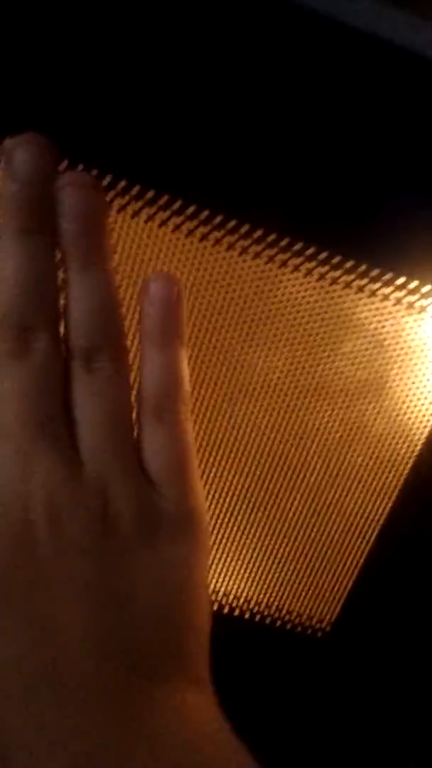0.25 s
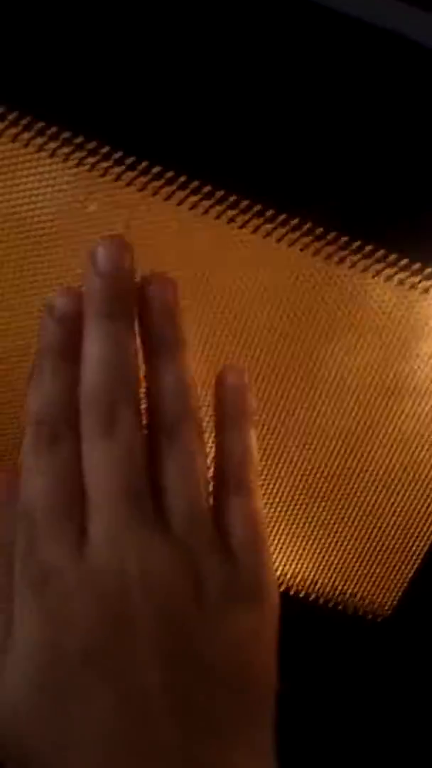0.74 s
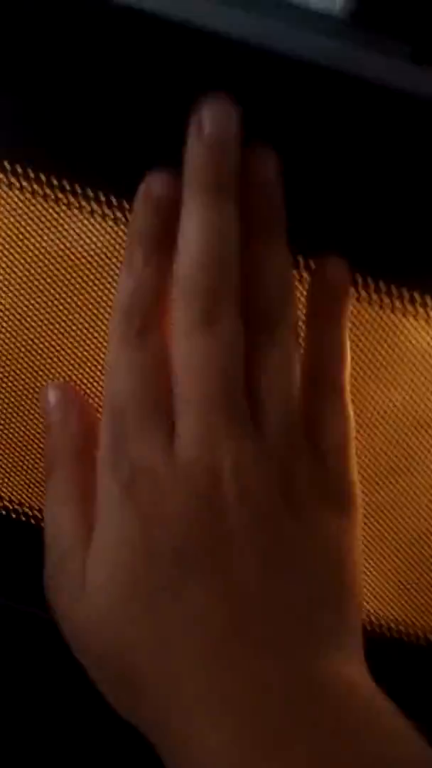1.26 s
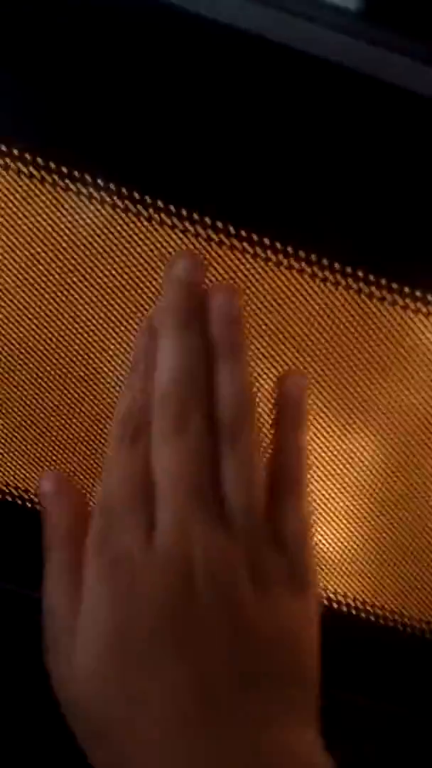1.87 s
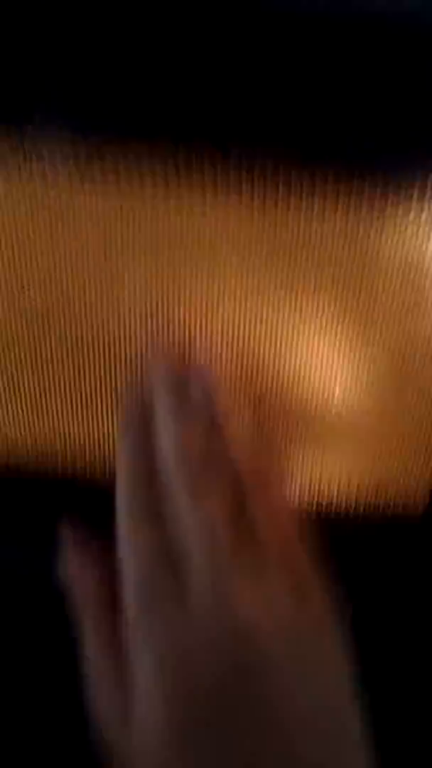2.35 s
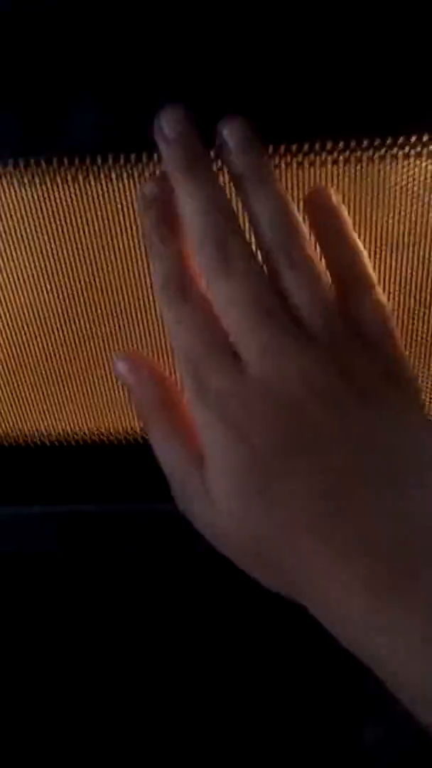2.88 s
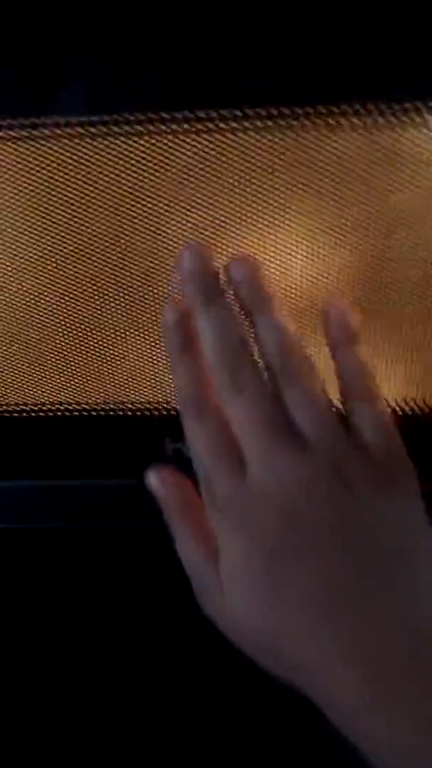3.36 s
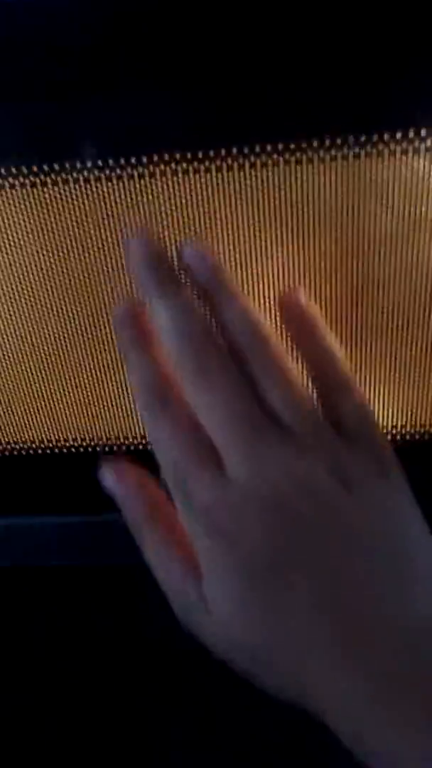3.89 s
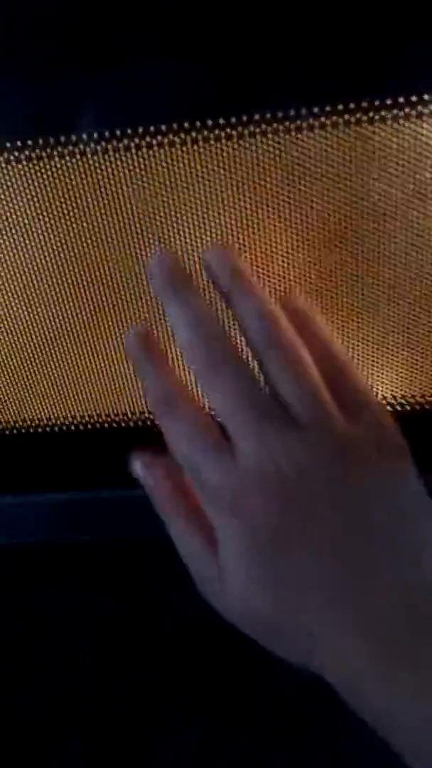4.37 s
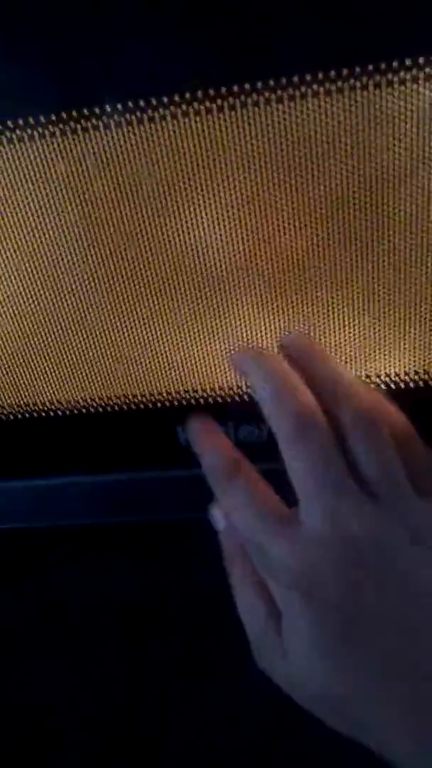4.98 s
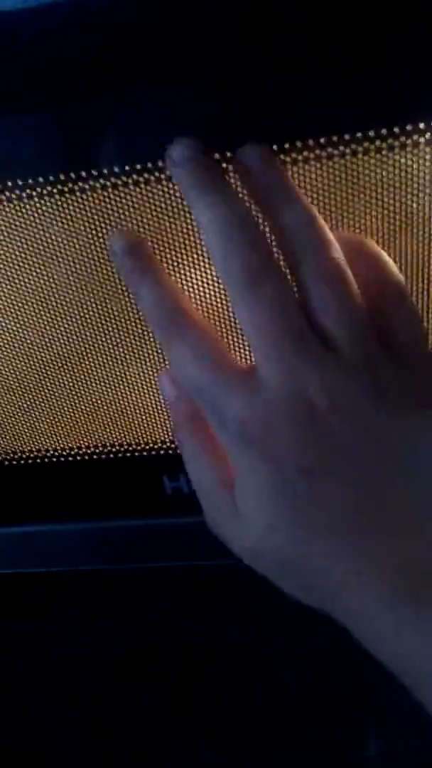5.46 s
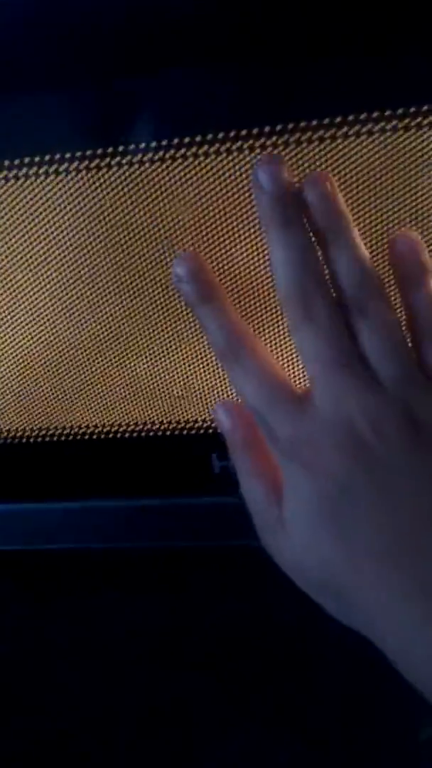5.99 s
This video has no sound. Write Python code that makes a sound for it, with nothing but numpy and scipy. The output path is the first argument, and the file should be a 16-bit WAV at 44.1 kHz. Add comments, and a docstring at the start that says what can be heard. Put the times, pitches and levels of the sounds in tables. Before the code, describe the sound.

Steady low electrical hum and fluttering vent air from a running oven, interrupted by handling knocks that make the drone dip and recover.

```python
"""A microwave oven hums, buzzes and blows close to a handheld camera: harmonics of the mains and of a fan's shaft
make the tones, filtered noise makes the rumble and the air rushing from the vents, which flutters.
Fingers tap, knock and rub on the camera: damped sines with snaps, and grainy noise; dull low noise swells briefly.
Two hard clicks push the gain control down, and the oven slowly swells back.
The two microphones have opposite polarity, so the hum sounds very wide."""
import sys
import numpy as np
from scipy.fft import rfft, irfft, next_fast_len
from scipy.io import wavfile
from scipy.ndimage import uniform_filter1d, minimum_filter1d, map_coordinates

SR = 44100
rng = np.random.default_rng(int(sys.argv[2]) if len(sys.argv) > 2 else 0)


def pcm_store(signal):
    """Save signal as 16-bit PCM."""
    levels = np.round(np.clip(np.atleast_2d(signal), -1, 1) * 32767)
    wavfile.write(sys.argv[1], SR, levels.astype(np.int16).T)


N = 274743
CLOCK = np.arange(N) / SR  # seconds

# Levels in the tables hold at the source, before propagation, the gains of scene() and the microphones.


def amp(db):
    """Decibel law: level to linear gain."""
    return 10 ** (np.asarray(db) / 20)


def unit(x):
    """Normalisation by signal power: rms 1."""
    return x / np.sqrt(np.mean(x ** 2) + 1e-20)


def along(points, hz):
    """Logarithmic frequency scale: (Hz, value) points interpolated at hz."""
    point_hz, values = np.transpose(points)
    return np.interp(np.log(hz + 1), np.log(point_hz + 1), values)


def wobble(rate):
    """Slow random modulation: a smooth curve through rate random knots a second."""
    knots = rng.standard_normal(int(N * rate / SR) + 4)
    return map_coordinates(knots, [np.arange(N) * rate / SR])


def filtered(x, response, size=2048):
    """Linear filtering: the spectrum of x times a complex response of frequency."""
    m = next_fast_len(N + SR // 2)
    # mirrored ends stay smooth
    wide = np.pad(x, [(0, 0)] * (x.ndim - 1) + [(size, size)], mode="reflect")
    spectrum = rfft(wide, m) * response(np.fft.rfftfreq(m, 1 / SR))
    return irfft(spectrum, m)[..., size:size + N]


def noise(spectrum):
    """Spectral density: white noise shaped to the given dB per Hz."""
    return filtered(rng.standard_normal(N), lambda hz: amp(along(spectrum, hz)) * np.sqrt(SR / 2))


def ringing(modes):
    """Resonance under random excitation: noise bands with steep skirts, one for each mode."""
    def power(hz):
        total = 0
        for centre, width, db in modes:
            density = amp(db) ** 2 * SR / (np.pi * width)
            total = total + density / (1 + ((hz - centre) / width) ** 2) ** 2
        return total
    return filtered(rng.standard_normal(N), lambda hz: np.sqrt(power(hz)))


PORT_LAG = .000317  # seconds between the microphones for short waves along their line


def ports(x, knee_hz=800, slant=1):
    """Phase difference on arrival: short waves reach the right microphone first, long waves press on both alike.

    A slanting arrival (slant below 1) shortens the lag."""
    def turn(hz):
        return np.pi * hz * PORT_LAG * slant * hz ** 4 / (hz ** 4 + knee_hz ** 4)
    return filtered(x, lambda hz: np.exp(1j * np.outer([-1, 1], turn(hz))))


def partials(orders, phase, flutter_db):
    """Harmonic series: sines at multiples of one phase; the higher ones waver more in level."""
    total = 0
    for k, db in orders:
        level = amp(db + flutter_db * np.sqrt(k) * wobble(15))
        start = rng.uniform(0, 2 * np.pi)
        total = total + np.sqrt(2) * level * np.sin(k * phase + start)
    return total


MAINS_HZ = 59.97
# The transformer and the panels it shakes. Each row: multiple of the mains frequency, level in dB rms.
HUM_HARMONICS = [(1, -34.8), (2, -12.8), (3, -33), (4, -31.5), (5, -38), (6, -48), (8, -53), (9, -54),
                 (12, -58), (14, -57), (22, -55.5), (28, -64), (32, -62), (55, -67.5), (61, -68), (71, -69),
                 (79, -73)]
# Line spectrum of rattling loose steel. Each row: frequency in Hz, amplitude of a line in dB before its scatter.
BUZZ_LINES = [(1200, -82), (2000, -71), (2900, -73), (3600, -76), (4400, -83), (5500, -92), (8000, -98)]


def transformer():
    """Magnetostriction: the core hums at twice the mains rate; loose steel adds a faint buzz of high harmonics."""
    phase = 2 * np.pi * MAINS_HZ * CLOCK + 0.0068 * wobble(3.0)
    hum = partials(HUM_HARMONICS, phase, flutter_db=.36)
    # every mains cycle repeats the same rattle
    orders = np.arange(20, 130)
    cycle = np.linspace(0, 2 * np.pi, num=4096, endpoint=False)
    sizes = amp(along(BUZZ_LINES, orders * MAINS_HZ) + 2 * rng.standard_normal(len(orders)))
    starts = rng.uniform(0, 2 * np.pi, (len(orders), 1))
    rattle = sizes @ np.sin(np.outer(orders, cycle) + starts)
    buzz = np.interp(phase, cycle, rattle, period=2 * np.pi)
    return ports(hum + buzz, slant=0.77)


SHAFT_HZ = 46.58  # mean speed of the shaft
# A fan with four blades. Each row: multiple of the shaft speed, level in dB rms.
FAN_HARMONICS = [(1, -37.5), (4, -28), (5, -45), (8, -35), (12, -40), (16, -49.5), (24, -55), (36, -60)]
# Narrow modes of the casing. Each row: frequency in Hz, half-width in Hz, level in dB rms.
CASING_MODES = [(75, 2, -52), (167, 4, -35), (260, 3, -45), (307, 2, -38)]
# Low turbulence noise. Each row: frequency in Hz, density in dB per Hz.
RUMBLE_SPECTRUM = [(25, -84), (42, -77), (60, -67), (100, -54.5), (165, -46.5), (215, -52), (280, -56),
                   (335, -63), (390, -55), (450, -59), (510, -63.5), (640, -73), (900, -76), (1600, -110)]


def fan():
    """Blade-passing tones and turbulence: the fan turns a little unevenly and shakes the casing, which radiates."""
    speed = SHAFT_HZ * (1 + 0.002 * wobble(2.91))
    blades = partials(FAN_HARMONICS, 2 * np.pi * np.cumsum(speed) / SR, flutter_db=.3)
    rumble = amp(1.7 * wobble(14)) * noise(RUMBLE_SPECTRUM)
    return ports(blades + ringing(CASING_MODES) + rumble, slant=0.68)


VENT_FLUTTER_DB, VENT_FLUTTER_PER_S = 2.1, 16  # random swing, knots a second


def fluttering(modes, count=3):
    """Amplitude modulation by eddies: resonances in interleaved groups, so neighbours swell at different moments."""
    total = 0
    for i in range(count):
        swell = unit(amp(VENT_FLUTTER_DB * wobble(VENT_FLUTTER_PER_S)))
        total = total + swell * ringing(modes[i::count])
    return total


# Broadband noise of the air. Each row: frequency in Hz, density in dB per Hz.
AIR_SPECTRUM = [(30, -70), (150, -68.5), (300, -69.5), (400, -76), (600, -69), (800, -69.5), (1050, -70.5),
                (1300, -79.5), (2200, -76.5), (3300, -81), (4000, -87.5), (5200, -88), (6500, -92),
                (8200, -95), (9600, -99), (15500, -105)]
# Part of the air sound coming along the line of the microphones. Each row: frequency in Hz, power share 0-1.
DIRECT_SHARE = [(400, 0.64), (1000, 0.95), (1500, 0.54), (2100, 0.32), (3300, 0.85), (4800, 0.94),
                (8000, 0.95), (9500, 0.54), (15000, 0)]
AIR_FROM_RIGHT = 0.62  # power share of the direct air noise that arrives from the right
# Vent resonances at the first and at the last position.
# Each row: frequency in Hz, half-width in Hz, level in dB rms at that position.
VENT_MODES_FIRST = [(922, 135, -48.5), (925, 68, -44), (1160, 57, -51), (1480, 130, -49), (1640, 75, -47.5),
                    (1765, 52, -49), (1975, 61, -49), (2500, 340, -47), (2715, 32, -50.5), (3190, 300, -45),
                    (4260, 305, -59), (4740, 89, -61)]
VENT_MODES_LAST = [(894, 120, -55.5), (927, 29, -49), (1110, 64, -46.5), (1450, 53, -50), (1509, 25, -60),
                   (1668, 120, -47.5), (2066, 25, -69), (2320, 120, -61.5), (2756, 25, -51.5),
                   (3147, 245, -43.5), (4254, 200, -59.5), (4840, 55, -65.5)]
# Slow course of the airflow's level. Each row: time in seconds, gain in dB.
AIRFLOW_LEVEL = [(0, 1), (1, 0.53), (2, -0.26), (2.6, 3), (3.3, 1.1), (3.65, 1), (3.9, 0.9), (4.5, 1.5),
                 (5.3, 1.36), (6.2, 0.5)]


def vents(position):
    """Turbulent jet noise: air from both sides and the room, with resonances that change along the door."""
    def stream():
        first = np.sqrt(1 - position) * fluttering(VENT_MODES_FIRST)
        last = np.sqrt(position) * fluttering(VENT_MODES_LAST)
        return ports(noise(AIR_SPECTRUM) + first + last, knee_hz=917)

    from_right = np.sqrt(AIR_FROM_RIGHT) * stream()
    from_left = np.sqrt(1 - AIR_FROM_RIGHT) * stream()[::-1]
    room = np.array([noise(AIR_SPECTRUM), noise(AIR_SPECTRUM)])
    direct = filtered(from_right + from_left, lambda hz: np.sqrt(along(DIRECT_SHARE, hz)))
    diffuse = filtered(room, lambda hz: np.sqrt(1 - along(DIRECT_SHARE, hz)))
    seconds, level_db = np.transpose(AIRFLOW_LEVEL)
    return (direct + diffuse) * amp(np.interp(CLOCK, seconds, level_db) + 0.52 * wobble(15))


MOVE_S, MOVE_LENGTH_S = 2.2, 0.93  # middle and length of the move along the door


def camera_position():
    """Smooth kinematics: the camera rests (0), glides along the door and rests again (1)."""
    progress = np.clip((CLOCK - MOVE_S) / MOVE_LENGTH_S + .5, 0, 1)
    return np.sin(np.pi / 2 * progress) ** 2


SWAY_DB, SWAY_PER_S = 0.59, 1.8  # random swing and knots a second: the hand is never quite still
BACK_S, BACK_WIDTH_S, BACK_DB = 4.16, 0.54, -0.8  # drawing back: middle, half-width at 1/e, gain at the middle


def nearness():
    """Distance law as a gain: the hand sways, and draws back once."""
    drawn_back = np.exp(-((CLOCK - BACK_S) / BACK_WIDTH_S) ** 2)
    return amp(BACK_DB * drawn_back + SWAY_DB * wobble(SWAY_PER_S))


def blow(db, hz, pan_db, cycles, snap, snap_s=.00006):
    """Impact on a damped shell: a dead push, down 60 dB after a few cycles, with a sharp snap, in stereo."""
    t = np.arange(SR // 20) / SR
    push = np.sin(2 * np.pi * hz * t) * amp(-60 * t * hz / cycles)
    hit = push / np.abs(push).max() + snap * (1 - t / snap_s) * np.exp(-t / snap_s)
    return np.outer(amp([db + pan_db / 2, db - pan_db / 2]), hit / np.abs(hit).max())


def add(out, s, sound):
    """Superposition: mixes a sound into out at time s."""
    out[:, round(s * SR):][:, :sound.shape[1]] += sound


# Soft fingertip taps. Each row: start in seconds, peak in dB before the shell, pitch in Hz, left minus right in dB.
FINGER_TAPS = [(2.085, 1, 292, 0), (2.189, -22, 1300, -3), (2.304, -11, 780, -4), (2.406, -13, 350, 7),
               (2.457, -11, 647, -5), (4.0103, -11.5, 840, 5)]
TAP_CYCLES, TAP_SNAP = 4.8, 0.089  # cycles until 60 dB down, snap relative to the push
# Hard clicks. Each row: start in seconds, peak in dB before the shell, pitch in Hz, cycles until 60 dB down,
# snap relative to the push, delay of the bounce in seconds, strength of the bounce 0-1.
HARD_CLICKS = [(1.565, -20, 8200, 2, .37, 0.00076, .3), (2.0823, -13.5, 900, 3.4, .4, 0.00065, 0.55),
               (2.0851, 10.5, 668, 1.25, .5, 0.00027, 0.33), (2.3884, 25, 3740, 3.2, 0.26, .00073, 1)]
CLICK_PAN_DB = -2  # left minus right
# Transmission of the camera's shell. Each row: frequency in Hz, gain in dB.
SHELL_RESPONSE = [(30, -1.5), (250, -3), (4000, -2), (6300, 1.5), (9000, 0), (12000, -10), (15500, -14)]


def knocks():
    """Structure-borne impact: fingertips land softly, hard contacts snap and bounce once, through the shell."""
    out = np.zeros((2, N))
    for s, db, hz, pan_db in FINGER_TAPS:
        add(out, s, blow(db, hz, pan_db, TAP_CYCLES, TAP_SNAP))
    for s, db, hz, cycles, snap, bounce_s, bounce in HARD_CLICKS:
        click = blow(db, hz, CLICK_PAN_DB, cycles, snap)
        add(out, s, click)
        add(out, s + bounce_s, bounce * click)
    through_shell = filtered(out, lambda hz: amp(along(SHELL_RESPONSE, hz)))
    return ports(through_shell, knee_hz=107)


# Colour of skin friction, its overall level normalised. Each row: frequency in Hz, relative density in dB.
SKIN_COLOUR = [(100, 18), (700, 2.5), (1700, 5), (2900, 7), (5000, -1.5), (8300, 1), (10000, -4.5),
               (12000, -17), (15500, -24)]
# The shell rings under a sliding finger. Each row: frequency in Hz, half-width in Hz, dB over the friction noise.
SHELL_MODES = [(4160, 2500, -3.5)]
SKIN_DIRECT = 0.87  # power share that runs through the shell from one microphone to the other


def skin():
    """Stick-slip friction: skin slides on the shell in fine uneven grains, stereo, rms 1."""
    def slide():
        return unit(noise(SKIN_COLOUR)) + ringing(SHELL_MODES)
    shared = np.sqrt(SKIN_DIRECT) * ports(slide(), knee_hz=100)
    separate = np.sqrt(1 - SKIN_DIRECT) * np.array([slide(), slide()])
    return unit((shared + separate) * amp(2.3 * wobble(250)))


CLICK_TAIL_DB, CLICK_TAIL_T60_S = -28.5, 0.039  # relative to the click's tabled peak, time to fall 60 dB


def click_tails():
    """Exponential decay: each hard click trails a short fading hiss with the colour and grain of skin()."""
    out, hiss = np.zeros((2, N)), skin()
    for s, db, *_ in HARD_CLICKS:
        fade_db = 60 * np.maximum(CLOCK - s, 0) / CLICK_TAIL_T60_S
        out += (CLOCK > s) * amp(db + CLICK_TAIL_DB - fade_db) * hiss
    return out


# Strokes of a sliding finger, from the second row on. Each row: start in seconds, length in seconds, starting
# level in dB before the attack and tilt, brightness in dB per octave, left minus right in dB.
FINGER_STROKES = [(2.091, 0.012, -44, 7, -4), (2.298, 0.018, -29.5, 1.5, -4),
                  (2.351, 0.018, -34, -4.5, 8.5), (2.37, 0.018, -33, -1.5, 2), (2.4, 0.13, -21, -1, -1),
                  (3.834, 0.18, -40.5, -6, 0), (4.059, 0.071, -40, -6, -3)][1:]
STROKE_ATTACK_S, STROKE_SAG_DB_PER_S, STROKE_RELEASE_T60_S = 0.0092, 69, 0.18
SKIN_PIVOT_HZ = 4040  # brightness tilts the friction about this frequency


def fingers():
    """Friction follows pressure: strokes start fast, weaken as the finger slows and fade as it lifts."""
    out, friction = np.zeros((2, N)), skin()
    for s, length, db, bright_db, pan_db in FINGER_STROKES:
        t = np.maximum(CLOCK - s, 0)
        lift_db = 60 * np.maximum(t - length, 0) / STROKE_RELEASE_T60_S
        attack = np.minimum(t / STROKE_ATTACK_S, 1)
        pressure = attack * amp(db - STROKE_SAG_DB_PER_S * t - lift_db)
        # flat below 1000 Hz
        tilt = lambda hz: amp(bright_db * np.log2(np.maximum(hz, 1000) / SKIN_PIVOT_HZ))
        out += amp([[pan_db / 2], [-pan_db / 2]]) * pressure * filtered(friction, tilt)
    return out


# Short dull swells of noise. Each row: middle in seconds, level in dB rms at the middle.
LOW_SWELLS = [(2.345, -19), (2.375, -15), (2.737, -11), (2.885, -14), (2.925, -12), (3.115, -13.5),
              (3.15, -18)]
SWELL_WIDTH_S = 0.015  # half-width at 1/e
# Colour of a swell, its overall level normalised. Each row: frequency in Hz, relative density in dB.
SWELL_SPECTRUM = [(30, -28), (80, 1), (140, 3), (280, -11), (500, -30), (1200, -63)]


def low_swells():
    """Gaussian envelopes on filtered noise: short dull low swells, nearly alike at both microphones."""
    level = sum(amp(db) * np.exp(-((CLOCK - s) / SWELL_WIDTH_S) ** 2) for s, db in LOW_SWELLS)
    return ports(level * unit(noise(SWELL_SPECTRUM)))


HUM_DB, HUM_CHANGE_DB = 0.26, -0.5  # gain at position 0, and its change up to position 1


def scene():
    """Superposition: the oven, balanced by the camera's position, the contacts on the camera and the low swells."""
    position = camera_position()
    hum = amp(HUM_DB + HUM_CHANGE_DB * position) * (transformer() + fan())
    oven = nearness() * (hum + vents(position))
    return oven + knocks() + click_tails() + fingers() + low_swells()


def gain_control(x, ceiling_db, recovery_db=11):
    """Peak limiting: a peak over the ceiling cuts the gain at once; it climbs back by recovery_db a second."""
    over = np.maximum(20 * np.log10(np.abs(x).max(axis=0) + 1e-9) - ceiling_db, 0)
    climb = recovery_db * CLOCK
    cut = np.maximum.accumulate(over + climb) - climb
    return x * uniform_filter1d(minimum_filter1d(amp(-cut), size=9), size=9)


TOP_HZ = 15600  # band limit
# Mismatch of the microphones. Each row: frequency in Hz, left minus right in dB.
MIC_MISMATCH = [(120, 1.3), (250, 0.92), (350, 0.7), (480, 0.64), (1000, -1), (2400, -0.5), (3500, 0.5),
                (5000, 1), (7500, -2), (10000, -0.5), (15000, 0.5)]


def record(dry, hiss_db=-78):
    """Transduction: unequal microphones, right one inverted; gain control, clipping, converter hiss, band limit."""
    mics = filtered(dry, lambda hz: amp(np.outer([.5, -.5], along(MIC_MISMATCH, hz))))
    opposed = mics * np.array([[1], [-1]])
    held = gain_control(opposed, ceiling_db=1.5)
    clipped = held / (1 + np.abs(held / .95) ** 8) ** (1 / 8)
    hiss = amp(hiss_db) * rng.standard_normal((2, N))
    return filtered(clipped + hiss, lambda hz: hz < TOP_HZ)


dry = scene()
out = record(dry)
pcm_store(out)
```